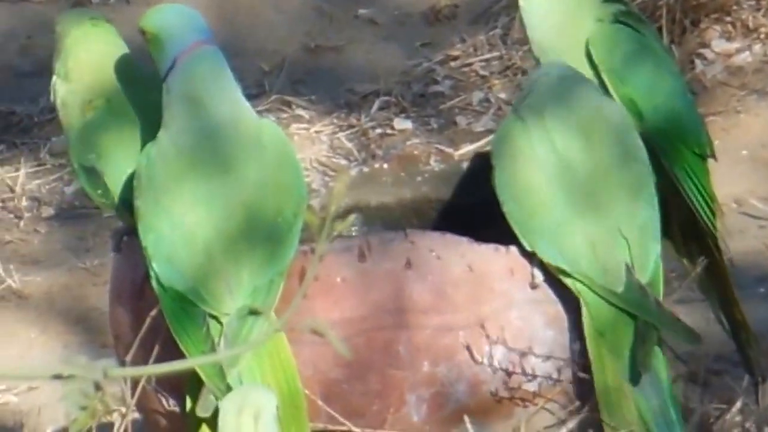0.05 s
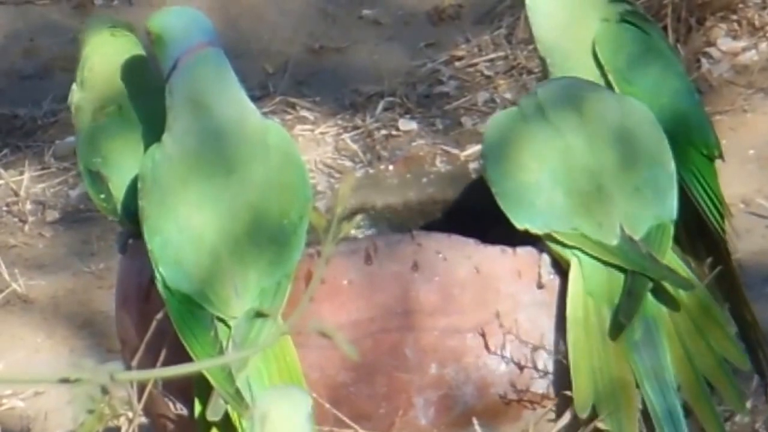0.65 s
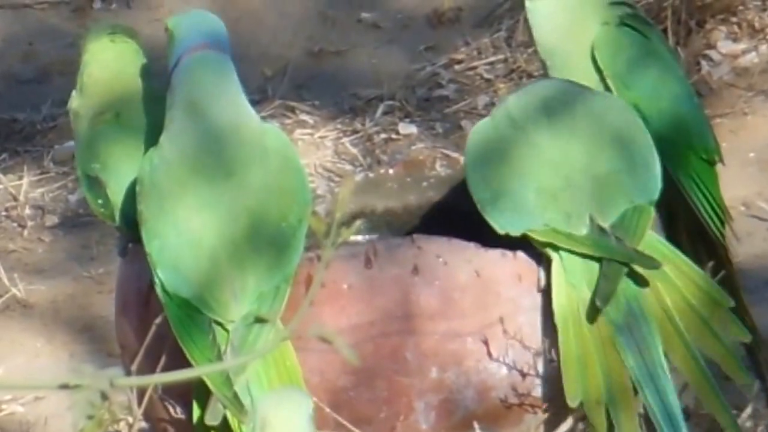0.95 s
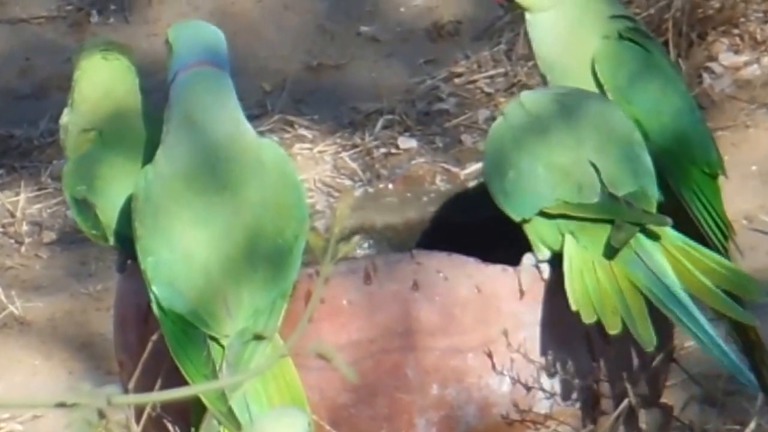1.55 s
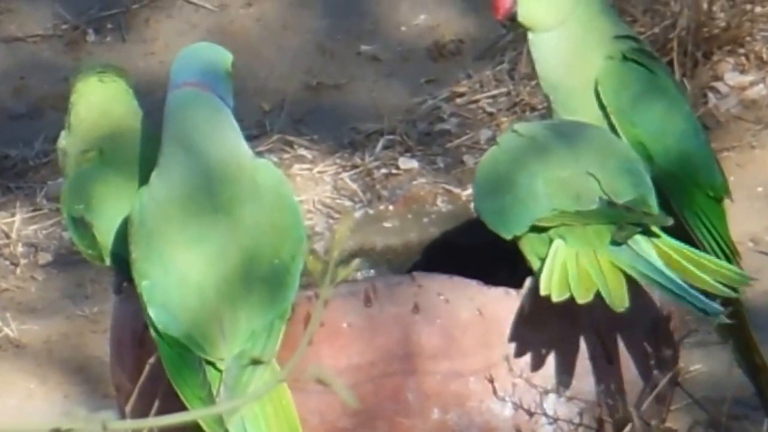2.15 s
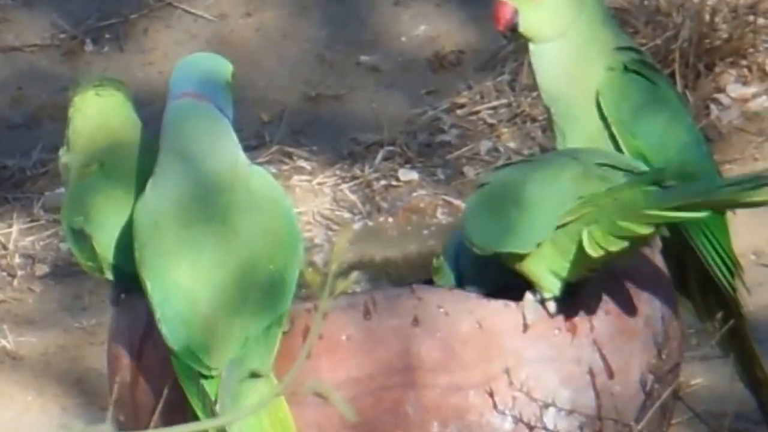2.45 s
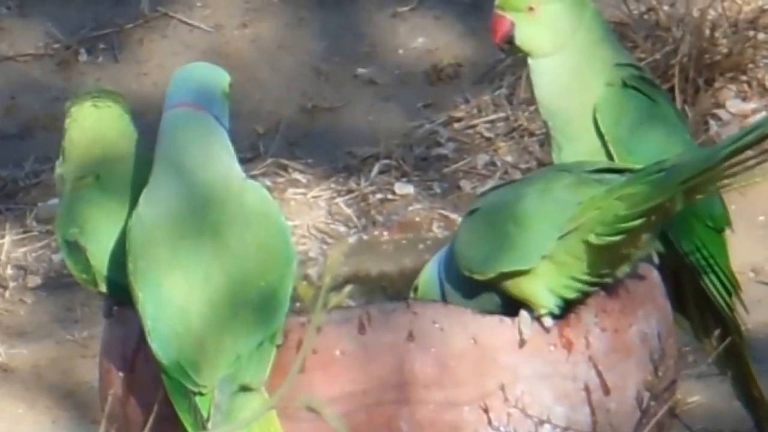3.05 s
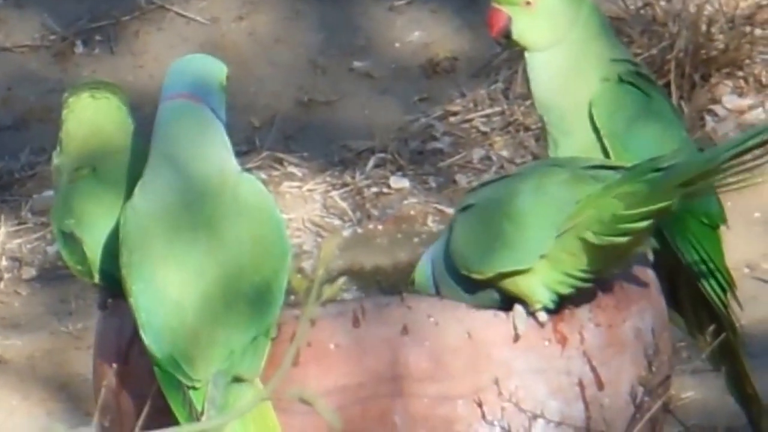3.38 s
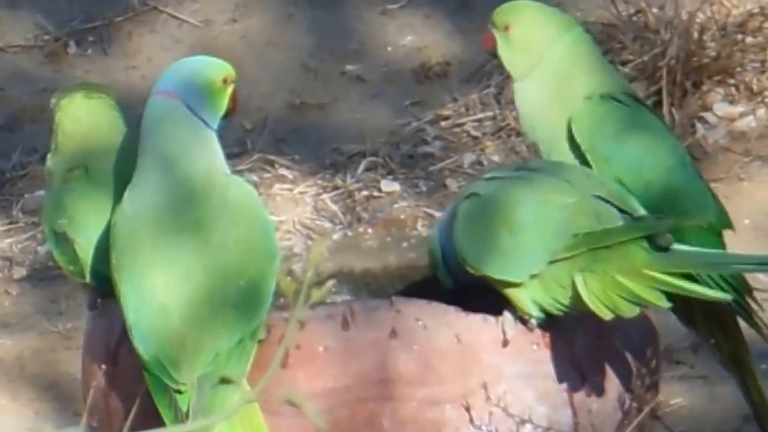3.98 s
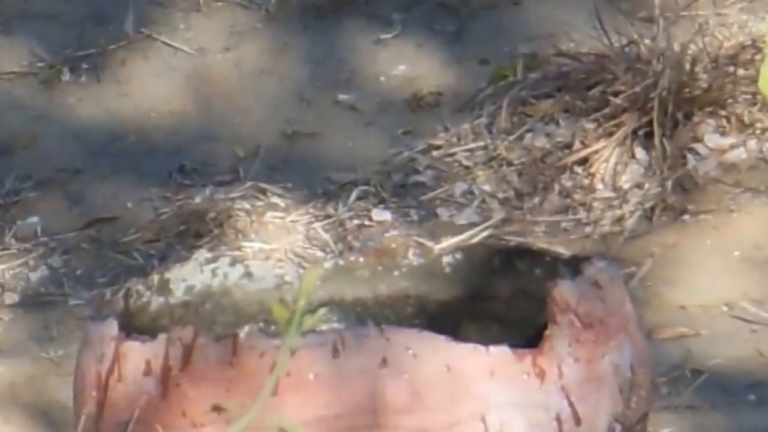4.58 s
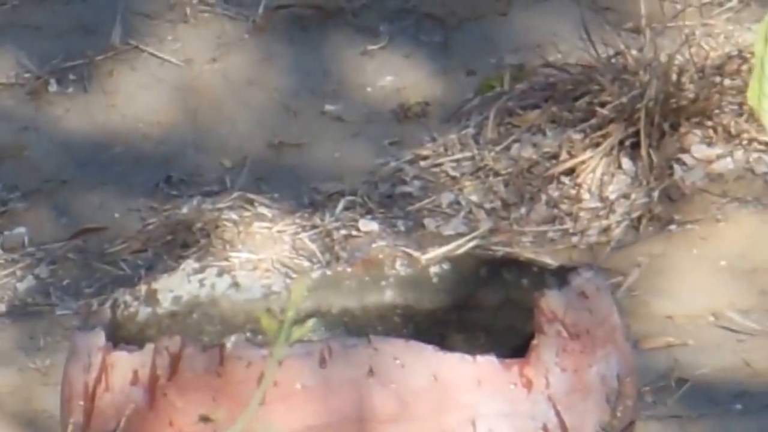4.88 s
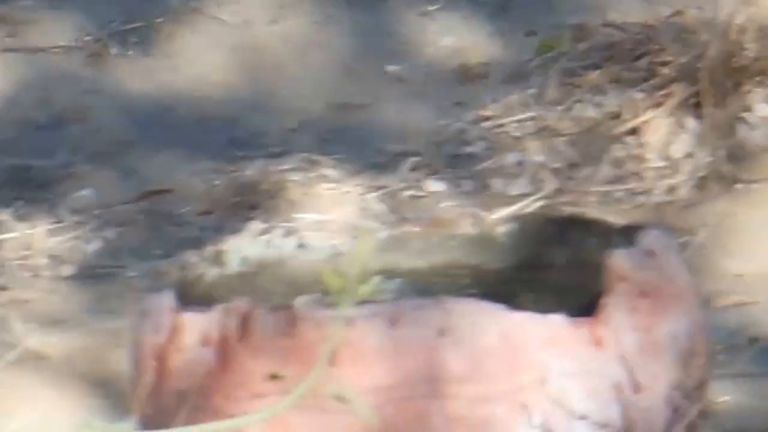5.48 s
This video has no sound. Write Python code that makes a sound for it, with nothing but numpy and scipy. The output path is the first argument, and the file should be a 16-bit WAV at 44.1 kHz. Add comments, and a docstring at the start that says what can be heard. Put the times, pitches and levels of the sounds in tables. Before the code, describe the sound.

A parrot flock chatters in scattered calls before a nearer bird breaks into a high trill, a loud squawk and quick peeps.

```python
"""A near parakeet whips its pitch up and down, trills, squawks and peeps in a village yard; further
off the flock rattles, chatters, screeches and mews, and beaks or claws tick. Each voice is a source
and a filter: a membrane in the syrinx vibrates, roughly when driven hard, and throat resonances shape
its harmonics. A hard surface close by doubles every call, the yard adds a short reverberant tail,
and a faint low hum lies under the outdoor air."""
import sys
import numpy as np
from scipy import signal
from scipy.fft import rfft, irfft, next_fast_len
from scipy.io import wavfile
from scipy.ndimage import uniform_filter1d, map_coordinates

SR = 44100
rng = np.random.default_rng(int(sys.argv[2]) if len(sys.argv) > 2 else 0)


def pcm_store(signal):
    """Save signal as 16-bit PCM."""
    levels = np.round(np.clip(np.atleast_2d(signal), -1, 1) * 32767)
    wavfile.write(sys.argv[1], SR, levels.astype(np.int16).T)


N = 252693
TIME = np.arange(N) / SR

# throat responses: frequency_hz, gain_db
NEAR_TRACT = [(1200, -22), (2400, -8), (3400, 2), (4400, -10), (5700, -8), (7100, 4), (8200, -12),
              (10500, -18), (14000, -22)]  # near bird, two sharp resonances
SQUAWK_TRACT = [(1200, -18), (2300, 3), (3600, 1.5), (5200, 6.5), (7200, 2.5), (8300, 3), (11000, -1.5),
                (14000, -7)]  # near bird, broad and bright
FLOCK_TRACT = [(700, -26), (1400, -0.5), (2400, 4), (3600, 7), (5200, 5), (7000, 2.5), (10000, -1),
               (14000, -15)]  # flock, one broad peak


def trill(foot_hz=2330, arch_s=.029, lone_arch_s=5.316):
    """Swept resonance: each arch of pitch flashes as it crosses the resonances of the throat."""
    # course of one arch: share_of_length, share_of_climb
    arch_shape = [(0, 0), (.17, .16), (.32, .56), (.46, .7), (.55, .95), (.62, 1), (.72, .86), (.84, .45),
                  (1, .06)]
    # onsets of the arches: start_s
    starts = [3.976, 4.026, 4.080, 4.128, 4.177, 4.229, 4.279, 4.331, 4.384, 4.435]
    # the bird tires evenly from first arch to last: top_hz, level_db, fall_across_arch_db
    first, last, lone = (10900, -30, -5), (9250, -33.5, 13), (7100, -34.5, .92)
    arches = [*np.linspace(first, last, len(starts)), lone]
    u = np.linspace(0, 1, int(arch_s * SR))
    climb = uniform_filter1d(np.interp(u, *np.transpose(arch_shape)), size=90)
    out = np.zeros(N)
    for start_s, (top_hz, db, fall_db) in zip([*starts, lone_arch_s], arches):
        hz = foot_hz + (top_hz - foot_hz) * climb
        voice = colour(syrinx(hz, rough=.14, tilt_db=-15, hiss_db=-4, harmonics=2), NEAR_TRACT)
        breath = undb(-27) * colour(rng.standard_normal(len(u)), SQUAWK_TRACT)  # through the open beak
        effort = undb(-fall_db * u ** 2) * signal.windows.tukey(len(u), .15)
        add(out, start_s, undb(db) * unit((voice + breath) * effort))
    return out


def whip():
    """Frequency sweep: the near bird throws its pitch up two octaves and back, ahead of the trill."""
    # pitch contour: time_s, pitch_hz
    curve = [(3.753, 3320), (3.757, 5100), (3.7595, 6200), (3.763, 10000), (3.772, 14200), (3.786, 13800),
             (3.7945, 8500), (3.7995, 5800), (3.812, 2700)]
    return sweep(curve, SQUAWK_TRACT, db=-25.5, best_hz=7500, strain_db=15,
                 rough=.13, tilt_db=-7, hiss_db=7)


def upslur():
    """Swept resonance: a second, narrower sweep rises and falls through the sharp throat peaks."""
    # pitch contour: time_s, pitch_hz
    curve = [(3.9195, 3560), (3.926, 4050), (3.932, 6700), (3.938, 10500), (3.943, 11600), (3.951, 11600),
             (3.955, 10000), (3.959, 6300), (3.965, 3000)]
    return sweep(curve, NEAR_TRACT, db=-31, best_hz=5460, strain_db=2.5,
                 rough=.04, tilt_db=-11, hiss_db=6)


def squawk():
    """Frequency modulation: driven hard, the near bird's voice warbles and spreads into sidebands."""
    # contour: time_s, pitch_hz, level_db, roughness
    curve = [(4.47, 2328, -41, 0.6), (4.489, 3042, -25, 0.8), (4.494, 3597, -17.5, 0.06),
             (4.526, 3738, -20, 0.08), (4.537, 3416, -25.5, 0.3), (4.577, 3834, -18, 0.57),
             (4.595, 3164, -23.5, 0.43), (4.608, 3596, -30, 0.82), (4.695, 3690, -39.5, .6)]
    return long_call(curve, SQUAWK_TRACT, warble_depth=.22, tilt_db=-14, hiss_db=-4, harmonics=3)


def peeps(held_hz=3255, sag_hz_per_s=122, scoop_hz=427, scoop_s=.00484, full_length_s=.0269):
    """Nearly periodic vibration: clear notes scoop up to a pitch that sags over the series."""
    # notes: start_s, length_s, level_db
    series = [(4.606, 0.031, -46), (4.645, .018, -31.5), (4.699, .018, -29.5), (4.753, 0.02, -30.5),
              (4.809, 0.022, -29), (4.864, 0.026, -30), (4.917, .028, -31), (4.97, 0.032, -32),
              (5.026, 0.03, -32.5), (5.085, 0.029, -33.5), (5.142, 0.029, -34), (5.199, .031, -34),
              (5.257, 0.019, -34)]
    # throat response: frequency_hz, gain_db
    tract = [(1200, -22), (2400, 3), (3400, 5.5), (4400, 2), (5700, -19.5), (7100, 15), (8200, -10),
             (9700, -9.5), (14000, -22)]
    out = np.zeros(N)
    for start_s, length_s, db in series:
        t = TIME[:int(length_s * SR)]
        u = t / length_s
        sag = sag_hz_per_s * (start_s - series[0][0])
        scoop = scoop_hz * np.exp(-t / scoop_s)
        flick = 61000 * max(full_length_s - length_s, 0) * u ** 3  # a note cut short ends upward
        voice = syrinx(held_hz - sag - scoop + flick, rough=.078, tilt_db=-9.5, hiss_db=-12, harmonics=4)
        effort = signal.windows.tukey(len(t), .18) * undb(7 * np.sin(np.pi * u))
        add(out, start_s, undb(db) * unit(colour(voice, tract) * effort))
    return out


def syrinx(hz, rough, tilt_db, hiss_db, harmonics=7):
    """Nonlinear vibration of a membrane: harmonics slope by tilt_db an octave; rough runs 0 to 1."""
    size = len(hz)
    jitter = .0712 * rough * (wander(size, 600) + .873 * wander(size, 170)) + .00083 * wander(size, 146)
    phase = 2 * np.pi * np.cumsum(hz * (1 + jitter)) / SR
    tone = sum(undb(tilt_db * np.log2(k)) * np.sin(k * phase) * (k * hz < SR / 2)
               for k in range(1, harmonics + 1))
    subharmonic = .77 * np.cos(phase / 2 + .5 * wander(size, 248.4))  # alternate cycles differ
    rasp = .56 * wander(size, 449)
    hiss = undb(hiss_db) * rough * rng.standard_normal(size) * (1 + np.cos(phase))  # pulsed air stream
    return tone * (1 + rough * (subharmonic + rasp)) + hiss


def sweep(curve, tract, db, best_hz, strain_db, **timbre):
    """Source and filter in a wide glide: the source is strain_db weaker an octave from best_hz."""
    hz, = controls(curve)
    effort = undb(-strain_db * np.log2(hz / best_hz) ** 2) * signal.windows.tukey(len(hz), .08)
    voice = colour(syrinx(hz, harmonics=2, **timbre) * effort, tract)
    out = np.zeros(N)
    add(out, curve[0][0], undb(db) * unit(voice))
    return out


def long_call(curve, tract, warble_depth=0, warble_hz=135, **timbre):
    """Frequency modulation along a contour: pitch swings by the share warble_depth at full roughness."""
    hz, db, rough = controls(curve)
    swing = np.sin(2 * np.pi * np.cumsum(warble_hz * (1 + .245 * wander(len(hz), 120))) / SR)
    voice = colour(syrinx(hz * (1 + warble_depth * rough * swing), rough, **timbre), tract)
    voice /= np.sqrt(uniform_filter1d(voice ** 2, size=128) + 1e-12)  # the contour alone sets the level
    out = np.zeros(N)
    add(out, curve[0][0], voice * undb(db) * signal.windows.tukey(len(hz), .04))
    return out


def notes(table, tract, bend, taper, swell_db, **timbre):
    """Source and filter in short glides: bend is the start and end pitch as ratios to the middle."""
    out = np.zeros(N)
    parabola = np.polyfit([0, .5, 1], [bend[0], 1, bend[1]], 2)
    for start_s, length_s, pitch_hz, db, rough in table:
        u = np.linspace(0, 1, int(length_s * SR))
        voice = colour(syrinx(pitch_hz * np.polyval(parabola, u), rough, **timbre), tract)
        effort = signal.windows.tukey(len(u), taper) * undb(swell_db * np.sin(np.pi * u))
        add(out, start_s, undb(db) * unit(voice * effort))
    return out


def rattles():
    """Amplitude modulation: a voice in the flock opens in quick beats; the pitch leaps up within each."""
    # one contour per rattle: time_s, beat_rate_hz, level_db
    curves = [
        [(1.10, 62, -55), (1.16, 64, -46.5), (1.25, 72, -41.5), (1.33, 72, -42), (1.40, 75, -49)],
        [(2.93, 45, -58), (3.08, 54, -61), (3.22, 46, -52), (3.33, 45, -65)],
        [(3.478, 62, -50), (3.545, 73, -48), (3.59, 51, -43.5), (3.635, 52, -38.5), (3.685, 73, -40.5),
         (3.75, 70, -37.5)],
    ]
    # one voice per rattle: pitch_hz, leap_octaves
    voices = [(2450, 0.347), (2450, .6), (2700, .8)]
    # throat response: frequency_hz, gain_db
    tract = [(900, -5), (1600, 7), (2200, 1.5), (3600, 5), (4800, 1.5), (7000, -9.5), (8800, -3.5),
             (10300, 0.5), (12000, -11.5)]
    out = np.zeros(N)
    for curve, (pitch_hz, leap_octaves) in zip(curves, voices):
        rate_hz, db = controls(curve)
        beat = np.pi * np.cumsum(rate_hz * (1 + .0175 * wander(len(rate_hz), 47.8))) / SR
        hz = pitch_hz * 2 ** (-leap_octaves / 2 * np.sin(2 * beat))
        voice = colour(syrinx(hz, rough=.5, tilt_db=-10, hiss_db=0, harmonics=4), tract)
        add(out, curve[0][0], unit(voice * np.sin(beat) ** 2) * undb(db))
    return out


def screech():
    """Irregular vibration: one harsh, warbling cry roughens as it fades."""
    # contour: time_s, pitch_hz, level_db, roughness
    curve = [(.025, 2688, -42, 0.52), (.048, 3610, -33, .55), (.07, 4430, -29, 0.36), (.10, 4350, -34, .52),
             (.125, 3855, -34.5, 0.68), (.16, 3730, -35.5, 0.804), (.19, 3590, -42, 1),
             (.26, 3390, -49, 0.74)]
    return long_call(curve, FLOCK_TRACT, warble_depth=.11, tilt_db=-10, hiss_db=0, harmonics=3)


def mew():
    """Formant filtering: strong harmonics slide down through fixed throat resonances, then turn up."""
    # contour: time_s, pitch_hz, level_db, roughness
    curve = [(5.38, 2350, -62, 0.27), (5.418, 2533, -43, 0.18), (5.474, 2446, -40, 0.27),
             (5.546, 1961, -39, 0.23), (5.6, 1475, -38.5, 0.18), (5.646, 1254, -36.5, 0.18),
             (5.666, 1254, -39, 0.26), (5.72, 1555, -39.5, 0.35)]
    # throat response: frequency_hz, gain_db
    tract = [(1200, -12), (2600, 6), (3800, 7.5), (5400, 5.5), (7500, 3), (9000, 2), (10800, -9),
             (12700, 6), (14500, -16)]
    return long_call(curve, tract, tilt_db=-5.5, hiss_db=-1.5, harmonics=5)


def chatter():
    """Superposition: the flock's chirps, nasal whines and thin whistles add into one chatter."""
    # calls: start_s, length_s, pitch_hz, level_db
    rises = [(.27, 0.052, 2144, -45), (.50, 0.098, 2250, -45), (2.04, .06, 2450, -51),
             (2.09, 0.077, 2055, -46.5)]
    arches = [(.33, 0.12, 2554, -51), (.57, 0.11, 2670, -46), (3.79, .13, 2410, -45.5),
              (4.712, 0.038, 5400, -38.5), (4.768, 0.0165, 4490, -41.5), (5.275, .018, 4200, -39.5),
              (5.49, 0.066, 5700, -40)]
    whines = [(.455, .05, 1557, -46), (2.0, 0.054, 1323, -47.5), (2.5, .11, 1416, -46.5),
              (2.75, .15, 1150, -52.5)]
    whistles = [(1.3, 0.196, 3380, -52), (1.6, .18, 3380, -45.5), (1.77, .15, 3380, -56),
                (1.58, 0.18, 2990, -53)]
    # falling calls: start_s, length_s, pitch_hz, level_db, roughness
    falls = [(.528, 0.062, 3510, -46, 0.97), (.708, 0.01, 2320, -46, 0.2), (1.935, .09, 3990, -51, 0.28),
             (2.16, .035, 2750, -45.5, .4), (2.175, 0.059, 1955, -44, 0.23),
             (2.17, 0.087, 876, -52.5, 0.17), (2.205, .05, 2460, -51, 0.1), (2.41, .1, 837, -51, 0.36),
             (2.43, 0.092, 2750, -40.5, 0.49), (3.06, .032, 3250, -59, .2), (4.17, 0.071, 2014, -54.5, 0.1)]
    slur = [(2.64, 0.063, 4160, -46.5, 0.18)]
    # throat response that weakens a whine's fundamental: frequency_hz, gain_db
    nasal_tract = [(1400, -19), (2300, 3), (3600, -2), (4500, 5), (6000, -1), (8000, 2), (14000, -15)]
    out = notes(with_roughness(rises, .616), FLOCK_TRACT, bend=(.76, 1),
                taper=.37, swell_db=-10, tilt_db=-14.5, hiss_db=-8)
    out += notes(with_roughness(arches, .432), FLOCK_TRACT, bend=(.8, .72),
                 taper=.27, swell_db=0, tilt_db=-14, hiss_db=-2)
    out += notes(falls, FLOCK_TRACT, bend=(1.24, .8), taper=.27, swell_db=2.5, tilt_db=-16, hiss_db=-6)
    out += notes(with_roughness(whines, .11), nasal_tract, bend=(.85, .88),
                 taper=.28, swell_db=-1, tilt_db=-11.5, hiss_db=-10)
    out += notes(with_roughness(whistles, .039), FLOCK_TRACT, bend=(1, 1),
                 taper=.24, swell_db=0, tilt_db=-28, hiss_db=-25)
    out += notes(slur, FLOCK_TRACT, bend=(1.07, .95), taper=.3, swell_db=0, tilt_db=-24, hiss_db=-6)
    return out


def hoarse_run(start_s=.775, period_s=.064, length_s=.066, pitch_hz=2190, db=-44.5, fade_db_per_s=13):
    """Irregular vibration: four hoarse falling chirps in even succession, each a little weaker."""
    # throat response with an edge near 5 kHz: frequency_hz, gain_db
    tract = [(700, -22), (1500, 3), (2400, 6), (4200, 1), (5000, 5.5), (6000, -3.5), (7600, -2),
             (10000, -9), (14000, -17)]
    run = [(start_s + t, length_s, pitch_hz, db - fade_db_per_s * t) for t in period_s * np.arange(4)]
    return notes(with_roughness(run, .64), tract, bend=(1.24, .8),
                 taper=.34, swell_db=-4, tilt_db=-10, hiss_db=3)


def ticks(decay_s=.0034):
    """Impact noise: the brief, hard contact of a beak or claw gives a broadband crack."""
    # contacts: start_s, peak_db
    contacts = [(2.3208, -25), (2.421, -25.5), (2.5237, -30.5), (2.733, -25.5), (4.867, -31)]
    out, t = np.zeros(N), TIME[:SR // 50]
    for start_s, db in contacts:
        burst = rng.standard_normal(len(t)) * np.exp(-t / decay_s)
        crack = colour(burst, [(600, 2.5), (2500, 6.5), (7000, 2.5), (14000, -7)])
        add(out, start_s, undb(db) * crack / np.abs(crack).max())
    return out


def far_flock(start_s, end_s, count, db, low_hz, high_hz, rough):
    """Independent sources: birds in distant trees chirp at random times, pitches and levels."""
    when, length, pitch, weakness = rng.random((count, 4)).T
    hz = low_hz * (high_hz / low_hz) ** (pitch ** 2)
    starts = start_s + (np.arange(count) + when) / count * (end_s - start_s)
    chirps = zip(starts, .04 + .0714 * length, hz, db - 7 * weakness)
    return notes(with_roughness(chirps, rough), FLOCK_TRACT, bend=(.9, .85),
                 taper=.82, swell_db=5, tilt_db=-12, hiss_db=-25)


def reflect(x, lag_ms, pan_db, echo_db, echo_lag_ms, echo_ms=5.95):
    """Comb filtering: direct sound and one close reflection interfere; each lags on the right."""
    echo = undb(echo_db) * colour(x, [(3500, -1), (7000, -6.5), (13000, 6.5)])
    left = x + delay(echo, echo_ms)
    right = delay(x, lag_ms) + delay(echo, echo_ms + echo_lag_ms)
    return pan(np.array([left, right]), pan_db)


def yard(x, t60_s=.44):
    """Reverberation: scatter from ground, walls and trees decays exponentially, its own on each side."""
    t = TIME[:SR // 2]
    tails = [colour(rng.standard_normal(len(t)), [(7000, -1), (14000, -2.5)]) for _ in range(2)]
    envelope = undb(-60 * t / t60_s) * (1 - np.exp(-t / .00043))
    return np.array([signal.fftconvolve(x, unit(tail * envelope))[:N] for tail in tails]) / len(t) ** .5


def air(mid_db=-43.5):
    """Partial coherence: steady distant outdoor noise, its bass nearly the same on both sides."""
    # noise spectrum: frequency_hz, relative_density_db
    spectrum = [(15, -36), (25, -8.5), (103, 2), (240, -11), (290, -11.5), (358, -12), (716, -13),
                (840, -14.5), (1010, -16), (1430, -14.5), (2780, -21), (3100, -19.5), (5000, -30),
                (12700, -33.5), (14500, -35)]
    # stereo width: frequency_hz, side_minus_mid_db
    width = [(60, -20), (130, -16.5), (300, -10.5), (2000, -9.5), (6000, 1.5), (9000, -3), (13000, 1.5)]
    mid, side = (unit(colour(rng.standard_normal(N), spectrum)) for _ in range(2))
    side = colour(side, width)
    return np.array([mid + side, mid - side]) * undb(mid_db)


def hum(drift=.0489, waver_db=3):
    """Line spectrum: low tones, perhaps of a far engine, waver in pitch and level."""
    # tones: pitch_hz, level_db
    tones = [(39, -51.5), (79, -57), (116, -53.5), (160, -62)]
    out = np.zeros(N)
    for hz, db in tones:
        phase = 2 * np.pi * np.cumsum(hz * (1 + drift * wander(N, 22))) / SR
        out += undb(db) * unit(np.sin(phase) * undb(waver_db * wander(N, 14)))
    return out


def undb(db):
    """Decibels as an amplitude ratio."""
    return 10 ** (np.asarray(db) / 20)


def unit(x):
    """Normalisation to an RMS of one."""
    return x / np.sqrt(np.mean(x ** 2) + 1e-18)


def colour(x, points):
    """Zero-phase filtering by (frequency_hz, gain_db) points on a log-frequency axis."""
    size = next_fast_len(2 * len(x))
    hz, db = np.transpose(points)
    gain_db = np.interp(np.log(np.fft.rfftfreq(size, 1 / SR) + 1), np.log(hz), db)
    return irfft(rfft(x, size) * undb(gain_db), size)[:len(x)]


def wander(size, rate_hz):
    """Smooth random modulation with a spread near one."""
    position = np.arange(size) * rate_hz / SR
    knots = np.random.default_rng(rng.integers(2 ** 31)).standard_normal(int(position[-1]) + 2)
    return map_coordinates(knots, [position], order=3, mode="nearest")


def delay(x, ms):
    """Linear phase shift: a delay by any fraction of a sample."""
    size = next_fast_len(N + SR // 10)
    shift = np.exp(-2j * np.pi * np.fft.rfftfreq(size, 1 / SR) * ms / 1000)
    return irfft(rfft(x, size) * shift, size)[:N]


def pan(stereo, db):
    """Level difference: left minus right."""
    return stereo * undb([[db / 2], [-db / 2]])


def add(track, start_s, x):
    """Superposition of a sound on a track."""
    i = int(start_s * SR)
    track[i:i + len(x)] += x[:N - i]


def controls(curve):
    """Linear interpolation of a contour's columns, sample by sample."""
    times, *columns = np.transpose(curve)
    t = np.arange(times[0], times[-1], 1 / SR)
    return [np.interp(t, times, column) for column in columns]


def with_roughness(table, rough):
    """The same roughness appended to every call."""
    return [(*row, rough) for row in table]


def scene():
    """Superposition of direct sound, early reflections, reverberation and background."""
    whipped = whip()
    trilled = upslur() + trill()
    peeped, squawked, screeched = peeps(), squawk(), screech()
    far = far_flock(0, 5.6, count=40, db=-51.5, low_hz=1360, high_hz=2607, rough=.435)
    far += far_flock(1.35, 3, count=14, db=-48.5, low_hz=1427, high_hz=1730, rough=.78)
    flock = chatter() + hoarse_run() + far + mew()
    rattled = rattles()
    birds = reflect(whipped, lag_ms=.018, pan_db=-1.5, echo_db=-1, echo_lag_ms=.028)
    birds += reflect(trilled, lag_ms=.018, pan_db=-1.5, echo_db=-2, echo_lag_ms=.04)
    birds += reflect(peeped, lag_ms=.027, pan_db=-2.5, echo_db=-3.5, echo_lag_ms=.046)
    birds += reflect(squawked, lag_ms=.022, pan_db=-1.5, echo_db=-15, echo_lag_ms=.026)
    birds += reflect(screeched, lag_ms=.069, pan_db=-1.5, echo_db=-15, echo_lag_ms=.097, echo_ms=4.6)
    birds += reflect(flock + ticks(), lag_ms=.015, pan_db=-1.6, echo_db=-6.5,
                     echo_lag_ms=.028, echo_ms=5.5)
    birds += reflect(rattled, lag_ms=.011, pan_db=-2, echo_db=-9, echo_lag_ms=.017, echo_ms=2.7)
    # further birds arrive with a larger share of scatter
    scattered = undb(-11) * (whipped + trilled + peeped) + undb(-8.5) * squawked
    scattered += undb(-4.5) * (flock + screeched + rattled)
    return birds + yard(scattered) + pan(air() + hum(), db=-2)


def record(dry):
    """Band limiting: a steep low-pass filter cuts the treble above 14.5 kHz."""
    return signal.sosfilt(signal.ellip(10, .2, 80, 14500, fs=SR, output="sos"), dry)


dry = scene()
out = record(dry)
pcm_store(out)
```